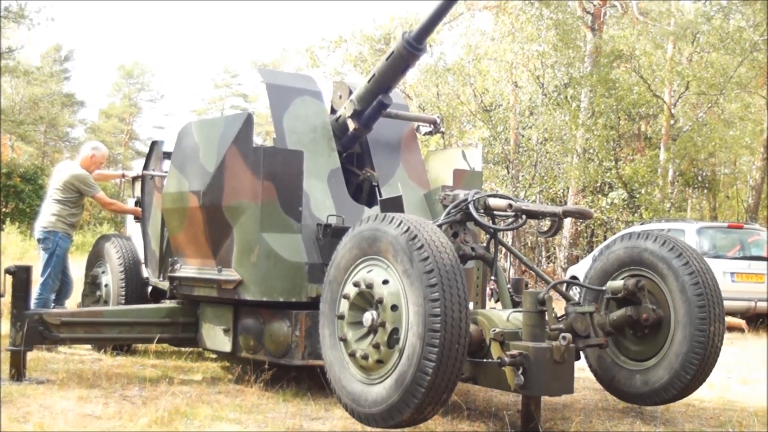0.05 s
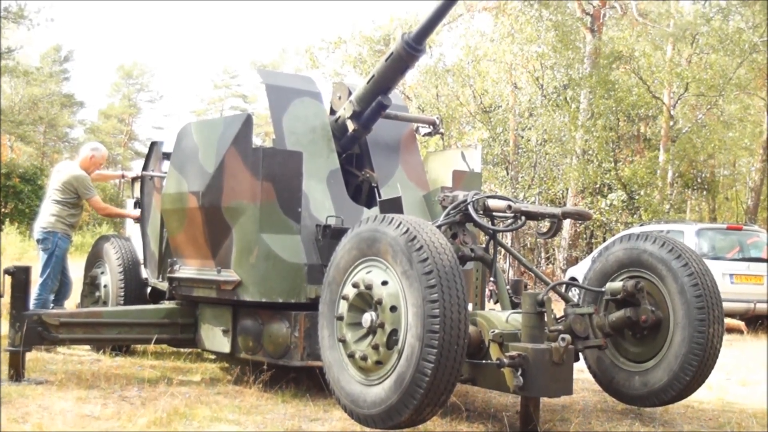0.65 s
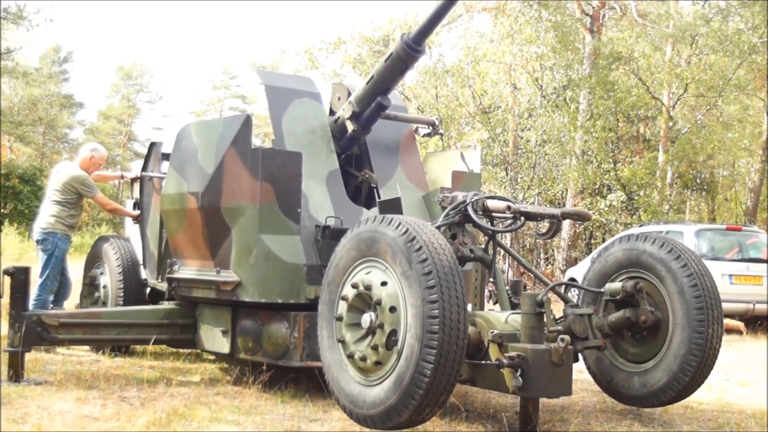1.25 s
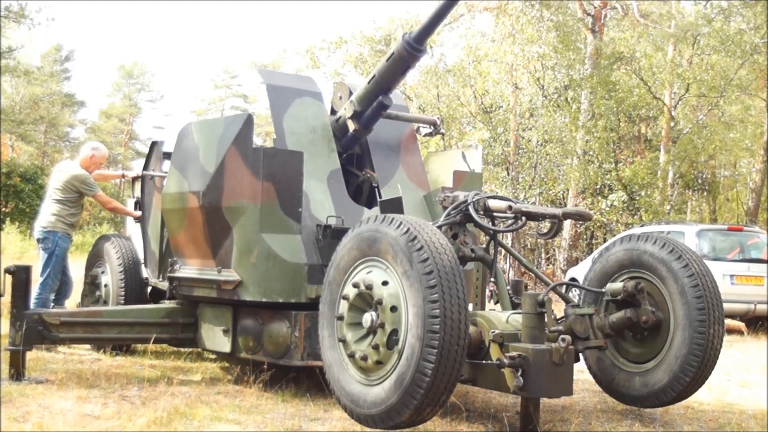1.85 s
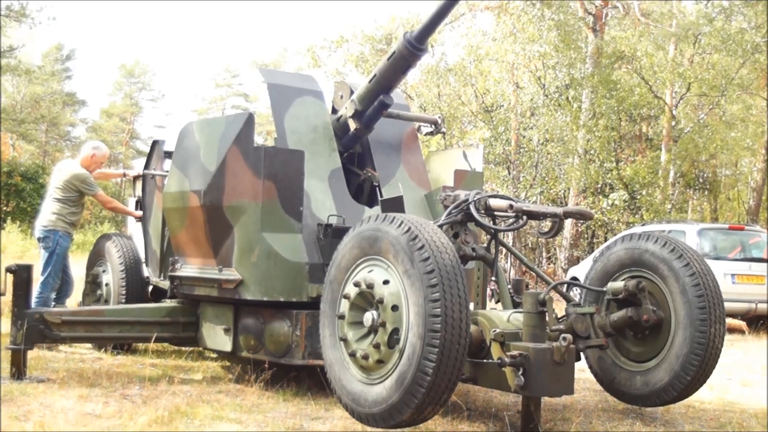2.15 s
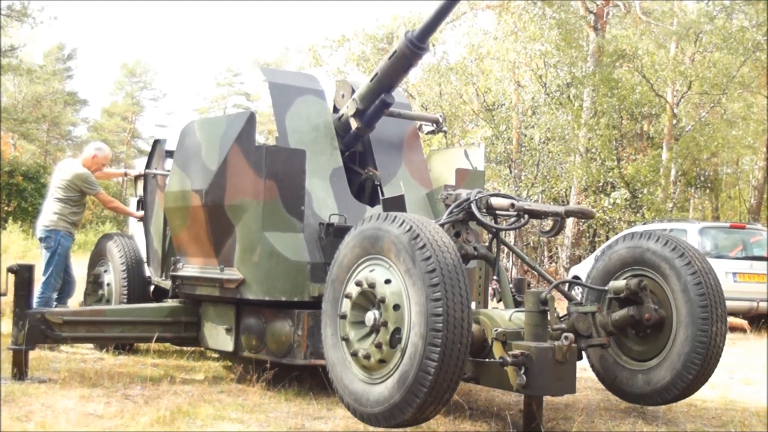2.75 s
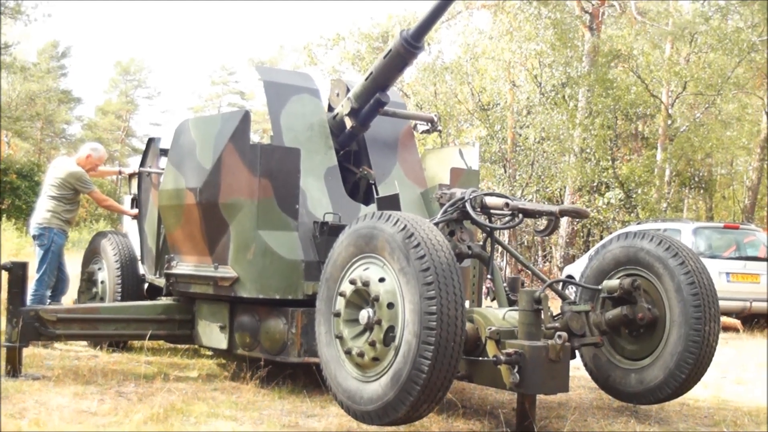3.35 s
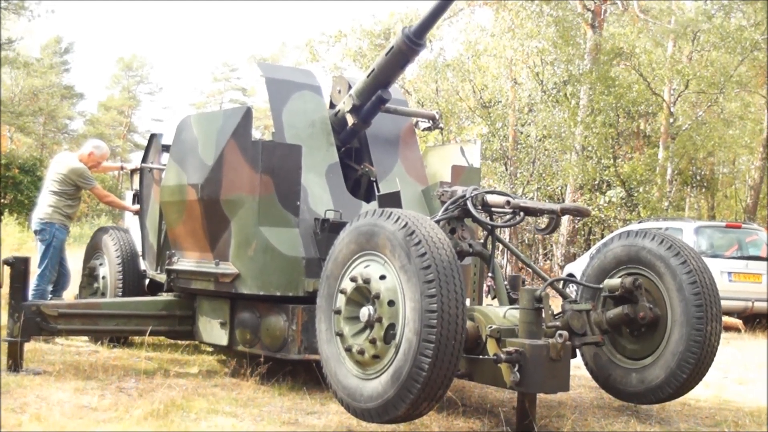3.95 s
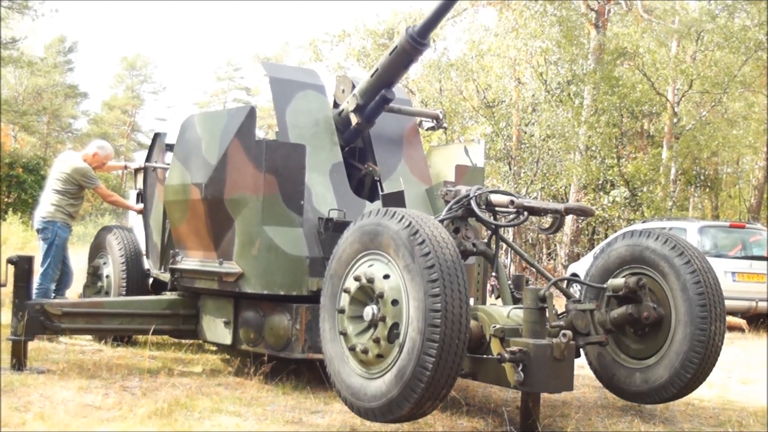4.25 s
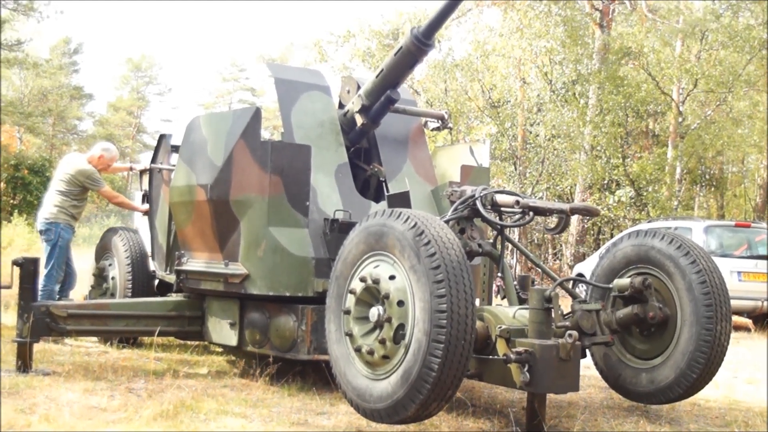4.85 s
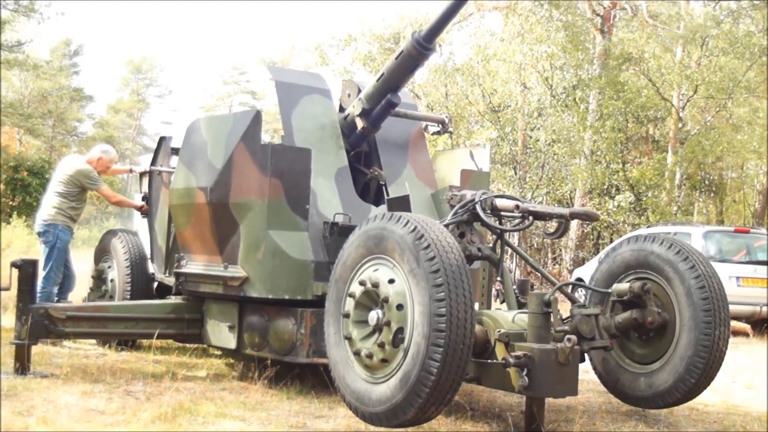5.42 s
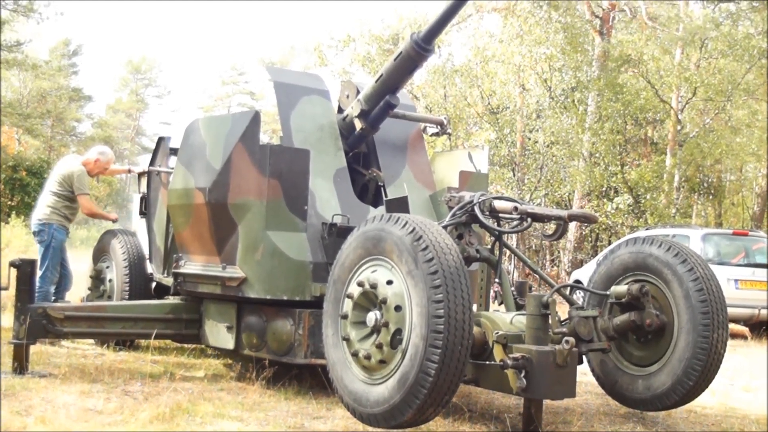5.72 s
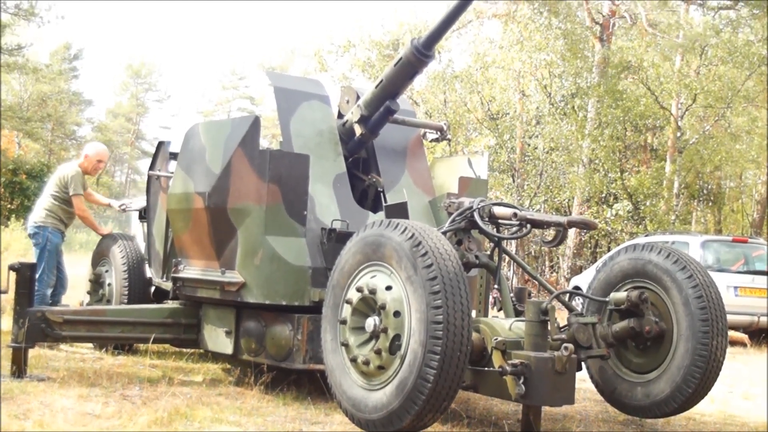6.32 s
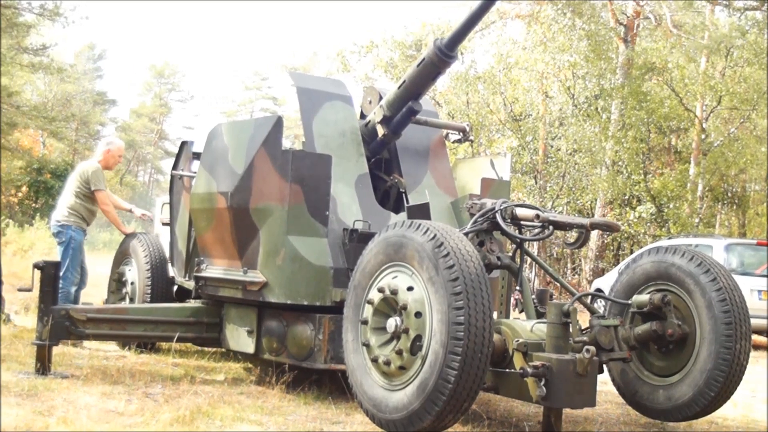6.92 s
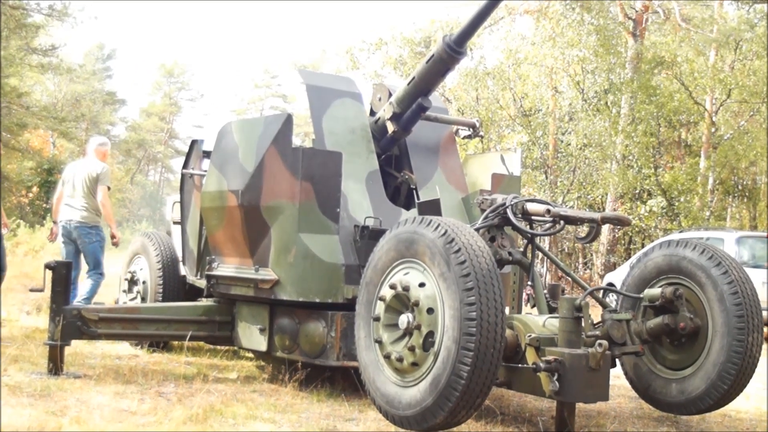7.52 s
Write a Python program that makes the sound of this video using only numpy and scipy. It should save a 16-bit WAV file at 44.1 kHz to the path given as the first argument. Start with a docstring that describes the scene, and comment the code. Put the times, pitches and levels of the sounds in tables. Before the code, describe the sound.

Slow thumps from a starting diesel engine quicken and merge into an even, clattering run in the open air.

```python
"""Outdoors, a small one-cylinder diesel on a towed gun carriage fires, speeds up and settles.
Each burn of fuel makes a hard knock and a puff in the exhaust pipe. The slow, separate thumps
merge into a throbbing drone, held steady by the governor (the part that limits the speed).
Valves clatter, gears whine faintly and the cooling fan hisses over a low open-air rumble.
The metal housing clacks a few times, and the drone dips slightly near the end."""
import sys
import numpy as np
from scipy import signal
from scipy.fft import rfft, irfft, next_fast_len
from scipy.io import wavfile
from scipy.ndimage import uniform_filter1d, minimum_filter1d, map_coordinates

SR = 44100
rng = np.random.default_rng(int(sys.argv[2]) if len(sys.argv) > 2 else 0)


def pcm_store(signal):
    """Save signal as 16-bit PCM."""
    levels = np.round(np.clip(np.atleast_2d(signal), -1, 1) * 32767)
    wavfile.write(sys.argv[1], SR, levels.astype(np.int16).T)


N = 334278


def amp(db):
    """Turn decibels into a gain to multiply by."""
    return 10 ** (np.asarray(db) / 20)

def unit(x):
    """Scale x to an average (rms) size of 1."""
    return x / np.sqrt(np.mean(x ** 2) + 1e-20)

def along(points, hz):
    """Read between (frequency, value) points on a pitch-like scale."""
    freqs, values = np.transpose(points)
    return np.interp(np.log(hz + 1), np.log(freqs + 1), values)

def curve(points):
    """Join (time, value) points into one value per sample."""
    return np.interp(np.arange(N) / SR, *np.transpose(points))

def wobble(rate):
    """A smooth curve through `rate` random values a second."""
    return map_coordinates(rng.standard_normal(int(N * rate / SR) + 4), [np.arange(N) * rate / SR])

def filtered(x, response):
    """Scale and delay each frequency in x as response(hz) says."""
    size = next_fast_len(N + SR // 2)
    return irfft(rfft(x, size) * response(np.fft.rfftfreq(size, 1 / SR)), size)[..., :N]

def coloured(x, colour):
    """Shape x with a table of levels by frequency, then scale it to size 1."""
    return unit(filtered(x, lambda hz: amp(along(colour, hz))))

def resonance(hz, centre_hz, width_hz):
    """How a ringing part answers each frequency; narrower rings longer."""
    return 1j * hz * width_hz / (centre_hz ** 2 - hz ** 2 + 1j * hz * width_hz)

def resonances(hz, rings):
    """How a part that rings at several pitches answers each frequency."""
    return sum(amp(db) * resonance(hz, centre, width) for centre, width, db in rings)

def ringing(x, centre_hz, width_hz):
    """Let x ring at one pitch."""
    return filtered(x, lambda hz: resonance(hz, centre_hz, width_hz) ** 2)

def noise(alike, size=N):
    """Stereo hiss; alike runs from 0 (unrelated sides) to 1 (identical)."""
    turn = np.arccos(np.clip(alike, 0, 1)) / 2
    mid, side = rng.standard_normal((2, size)) * [[np.cos(turn)], [np.sin(turn)]]
    return np.array([mid + side, mid - side])

def pulses(crank, place, scatter_db, lead_s=0):
    """One tap of slightly random size each time the crank passes a place in its cycle."""
    passes = np.arange(np.ceil(crank[0] - place), crank[-1] - place) + place
    samples = np.interp(passes, crank, np.arange(N)) - lead_s * SR
    sizes = amp(scatter_db * rng.standard_normal(len(samples)))
    return np.bincount(np.clip(np.round(samples), 0, N - 1).astype(int), sizes, N)

def burst(crank, place, length, steepness=16):
    """A swell that rises once a cycle and fades; place and length are in cycles."""
    age = (crank - place) % 1 / length
    return (1 - np.exp(-steepness * age)) * np.exp(-age)

# How fast the engine runs, one firing per cycle: (time [s], speed [cycles/s])
SPEED = [(0.0, 6.0), (0.18, 7.25), (0.3, 8.7), (0.42, 10.56), (0.65, 13.55), (0.9, 17.25), (1.15, 20.58),
         (1.4, 23.6), (1.65, 24.46), (1.9, 24.95), (2.2, 25.34), (2.8, 25.49), (3.5, 25.53), (4.3, 25.59),
         (5.5, 25.57), (7.58, 25.57)]
def speed_share():
    """Engine speed as a share of its final, steady speed."""
    return curve(SPEED) / SPEED[-1][1]

# Plenty of fuel to gain speed, then the governor cuts back: (time [s], fuel level [dB])
FUEL = [(0, -1.5), (.45, -1.5), (.95, 1), (1.42, -1.5), (1.52, -12.5), (2.2, -9), (2.9, -20)]
def driven(db, doubling_db, fuel_power=0):
    """A gain: db at steady speed, doubling_db more per doubling of speed, plus a share of the fuel."""
    return amp(db + doubling_db * np.log2(speed_share()) + fuel_power * curve(FUEL))

# Tone of the open air: (frequency [Hz], relative level [dB])
OUTDOOR_COLOUR = [(20, -4), (60, -0.5), (150, 9.5), (400, -6.5), (1500, -10.5), (6000, -24), (10000, -28.5),
                  (14000, -42)]
def outdoors():
    """A low, even rumble lies behind everything."""
    return amp(-35) * coloured(noise(0.42), OUTDOOR_COLOUR)

# What the muffler lets through: (frequency [Hz], relative level [dB])
MUFFLER_COLOUR = [(30, -21), (60, -2), (150, -3.5), (230, 7), (320, 3), (400, -8), (490, -11.5),
                  (620, -5.5), (740, -4.5), (920, -28), (1500, -43)]
def gas_rush(crank):
    """Swirling gas makes a rough rush that swells each time the exhaust opens."""
    flow = unit(1 + 0.23 * burst(crank, 0.215, length=0.62))
    rush = coloured(noise(0.91), MUFFLER_COLOUR)
    return driven(-28.5, doubling_db=1.2, fuel_power=0.066) * flow * rush

# Piston and valve hits: (place [cycles], relative level [dB], pitch [Hz], ring width [Hz])
CONTACTS = [(-.16, -8, 1950, 350), (-.075, 0, 1440, 190), (.075, -8, 2600, 1500), (.195, 1.5, 1215, 210),
            (.43, -7, 1750, 400), (.45, -13, 1130, 160), (.51, -11, 2400, 504), (.62, -9, 1400, 295),
            (.69, -12, 2980, 1800)]
def valve_taps(crank):
    """The piston and valves tap at set places in every cycle, each with its own short ring."""
    taps = np.zeros(N)
    for place, db, ring_hz, width_hz in CONTACTS:
        hits = pulses(crank, place, scatter_db=0.9)
        taps += amp(db) * unit(ringing(hits, ring_hz, width_hz))
    return driven(-39.6, doubling_db=22) * unit(taps)

# Rings of the thin metal covers: (pitch [Hz], width [Hz], relative level [dB])
COVER_RINGS = [(1360, 8.5, -16), (1848, 18.5, 3.5), (2430, 44, -3), (3690, 36, 9), (5000, 50, 2)]
# Tone of the clatter: (frequency [Hz], relative level [dB])
CLATTER_COLOUR = [(600, -6), (800, -16), (900, -12), (1060, -10), (1200, -2), (1500, 1), (1750, -5),
                  (2200, -3.5), (2750, -13.5), (3200, -13), (3800, -15.5), (4500, -17), (7000, -26),
                  (12000, -27.5)]
def clatter(crank, looseness=0.61, fade_s=0.13):
    """The same hits set the engine block and its covers ringing, with a loose rattle on top."""
    decay = amp(-60 * np.arange(SR // 12) / SR / fade_s)
    block, energy = np.zeros((2, N)), np.zeros(N)
    for place, db, _, _ in CONTACTS:
        hits = amp(db) * pulses(crank, place, scatter_db=1.4)
        one_hit = decay * noise(0.95, size=len(decay))
        block += signal.fftconvolve(hits[None], one_hit, axes=1)[:, :N]
        energy += signal.fftconvolve(hits ** 2, decay ** 2)[:N]
    rattle = looseness * unit(np.sqrt(np.abs(energy)) * noise(0.83))
    covers = filtered(unit(block) + rattle, lambda hz: 1 + resonances(hz, COVER_RINGS))
    return driven(-39.5, doubling_db=6) * coloured(covers, CLATTER_COLOUR)

# Two soft extra thumps in the pipe as the engine starts: (time [s], relative level [dB])
EXTRA_THUMPS = [(0.016, -10), (0.298, -15)]
# Rings of the muffler's chambers: (pitch [Hz], width [Hz], relative level [dB])
CHAMBER_RINGS = [(172, 15, 3), (228, 22, -1), (283, 18, -3), (320, 20, -5)]
def thumps(crank, muffler_hz=345, leak=0.07):
    """Puffs of exhaust and intake air ring the pipe and muffler; their boom fades with speed."""
    speed = speed_share()
    separate = 1 / (1 + (speed / 0.782) ** 14)  # intake puffs fade out near 78% speed
    intake = separate * amp(1) * pulses(crank, 0.506, scatter_db=1.2, lead_s=0.00605)
    intake_shut = separate * amp(-5) * speed * pulses(crank, 0.72, scatter_db=2.5, lead_s=0.00595)
    exhaust = pulses(crank, 0.2568, scatter_db=1.1, lead_s=0.005635)
    puffs = driven(-7.5, doubling_db=-3.5, fuel_power=0.25) * exhaust + intake + intake_shut
    for time, db in EXTRA_THUMPS:
        puffs[round(time * SR)] += amp(db)
    pipe = lambda hz: resonance(hz, centre_hz=195, width_hz=175)
    ring = filtered(puffs, lambda hz: pipe(hz) * (leak + pipe(hz) + resonances(hz, CHAMBER_RINGS)))
    boom = amp(-6) * ringing(puffs * (1 - speed) ** 2, centre_hz=74.6, width_hz=55)
    treble_cut = signal.butter(4, muffler_hz, fs=SR, output="sos")
    return amp(33) * signal.sosfilt(treble_cut, ring + boom)

# Tone of the burning fuel: (frequency [Hz], relative level [dB])
BURN_COLOUR = [(220, -15), (350, -2), (415, 3.5), (480, -11), (600, -6), (755, -2), (920, -10),
               (1160, -4.5), (1340, -10), (1570, -3.5), (1950, -8.5), (2700, -16), (3300, -17.5),
               (3900, -27.5), (5200, -28.5), (10000, -32.5), (13000, -38)]
# Rings of the cylinder head, its metal lid: (pitch [Hz], width [Hz], relative level [dB])
HEAD_RINGS = [(624, 30, -2), (748, 33, 7), (1190, 45, 4), (1483, 50, 4), (1610, 50, -4), (2930, 95, 6.5),
              (3200, 88, 4), (3800, 140, 3)]
def rasp(loudness):
    """The noise of burning follows a loudness curve, and the cylinder head rings on after it."""
    def head(hz):
        response = amp(along(BURN_COLOUR, hz)) * (1 + resonances(hz, HEAD_RINGS))
        return response / np.sqrt(np.mean(np.abs(response) ** 2))
    return filtered(loudness * noise(0.88), head)

def knock(crank, lead_s=0.0038, steady_part=0.11):
    """Fuel burns with a harsh rasp, then chuffs as the exhaust opens; more fuel is louder."""
    early = crank + lead_s * curve(SPEED)  # earlier in the cycle as speed rises
    burn = burst(early, -0.053, length=0.12, steepness=2.6)
    chuff = amp(-1) * burst(early, 0.16, length=0.19, steepness=2.1)
    return rasp(driven(-30.8, doubling_db=5.8, fuel_power=1.33) * unit(steady_part + burn + chuff))

# The first firings and their exhaust blows: (time [s], level [dB], time to fade 60 dB [s])
BARKS = [(.054, -23, .14), (.102, -26, .07), (.205, -22.5, 0.094), (.235, -23, .08), (.32, -34, .16)]
def barks(rise_s=0.0017):
    """Cold fuel catches all at once with a sudden, dry bark."""
    loudness = np.zeros(N)
    for time, db, fade_s in BARKS:
        age = np.maximum(np.arange(N) / SR - time, 0)
        loudness += amp(db - 60 * age / fade_s) * (1 - np.exp(-age / rise_s))
    return rasp(loudness)

def honk(crank):
    """Hard exhaust blows ring the thin shell of the muffler."""
    blows = pulses(crank, 0.1863, scatter_db=1.5)
    shell = unit(ringing(blows, centre_hz=368, width_hz=85))
    return driven(-31.5, doubling_db=16, fuel_power=0.72) * shell

# Clacks and scrapes of the housing:
# (time [s], level [dB], pitch [Hz], ring width [Hz], time to fade 60 dB [s], crack share [0-1])
CLACKS = [(.302, -19, 2130, 600, 0.029, .07), (3.032, -33, 3800, 4000, .16, 0.45),
          (3.052, -22, 7170, 2500, .018, 0.6), (3.054, -28, 3200, 3000, 0.022, 0.4),
          (3.058, -23, 2200, 1700, .023, 0.2), (3.195, -41, 5000, 4000, .3, 0.2),
          (6.584, -35, 2340, 1500, .19, .4)]
def clacks():
    """Metal meets metal: a sharp crack and one quickly fading ring."""
    out, age = np.zeros((2, N)), np.arange(SR // 4) / SR
    for time, db, ring_hz, width_hz, fade_s, crack_share in CLACKS:
        crack = crack_share * noise(0.28)
        ring = (1 - crack_share) * unit(ringing(noise(0.42), ring_hz, width_hz))
        start, decay = round(time * SR), amp(db - 60 * age / fade_s)
        out[:, start:start + len(age)] += decay * (crack + ring)[:, :len(age)]
    return out

def push(strokes, multiple):
    """How the strokes of one cycle add up at a multiple of the engine speed."""
    return sum(strength * np.exp(-2j * np.pi * multiple * place) for place, strength in strokes)

# The tones in the drone: (multiple of engine speed [x], relative level [dB])
DRONE_TONES = [(1, -42), (2, -23.5), (3, -2.5), (4, -4), (5, -2), (6, 2), (7, 0.5), (8, 4), (9, 1.5),
               (10, -12), (11, 0), (12, 3.5), (13, -19), (14, -29), (15, -38), (16, -15), (17, -19),
               (18, -22), (19, -34), (20, -18), (21, -36), (22, -42), (23, -15), (24, -25.5), (25, -11.5),
               (26, -28), (27, -19.5), (28, -8), (29, -16), (30, -23.5), (31, -35), (32, -22), (33, -19)]
# Firing, exhaust, intake opening and intake closing: (place [cycles], strength [0-1])
GAS_STROKES = [(.006, 0.97), (.184, 0.699), (.363, .64), (.623, 0.618)]
# Strokes that shake the housing: (place [cycles], strength [0-1])
HOUSING_STROKES = [(.19, 1), (.52, .5), (.84, .75)]
def drone(crank, dip_at_s=6.92, dip_width_s=0.074, dip_db=-1):
    """At speed the strokes overlap in the pipe and shake the housing, blending into steady tones."""
    times, speed = np.transpose(SPEED)
    bass, pipe, housing = np.zeros((3, N))
    for multiple, db in DRONE_TONES:
        hz = multiple * speed  # each tone changes level as its pitch climbs
        if multiple <= 15:
            layer = bass if multiple <= 4 else pipe
            pipe_ring = resonance(hz[-1], centre_hz=146, width_hz=140)
            phase = np.angle(-push(GAS_STROKES, multiple) * pipe_ring ** 2)
            climb_db = 1.8 * along(MUFFLER_COLOUR, hz)
        else:
            layer = housing
            housing_ring = resonance(hz, centre_hz=690, width_hz=130)
            phase = np.angle(push(HOUSING_STROKES, multiple) * housing_ring[-1] ** 2)
            climb_db = 5 * np.log10(np.abs(housing_ring))
        gain = curve(np.c_[times, amp(db + climb_db - climb_db[-1])])
        layer += gain * np.cos(2 * np.pi * multiple * crank + phase)
    for layer in (bass, pipe, housing):  # even out each layer, so speed sets its loudness
        layer /= np.sqrt(np.abs(uniform_filter1d(layer ** 2, size=SR // 4)))
    bass *= driven(-22.5, doubling_db=42) * amp(0.4 * wobble(12))
    pipe *= driven(-18.5, doubling_db=48)
    housing *= driven(-33, doubling_db=75) * amp(0.65 * wobble(20))
    dip = np.exp(-((np.arange(N) / SR - dip_at_s) / dip_width_s) ** 2)
    return amp(dip_db * dip) * (bass + pipe + housing)

# Tone of the cooling air: (frequency [Hz], relative level [dB])
FAN_COLOUR = [(300, 3), (950, 7.5), (1400, 7.5), (2000, 1), (3000, 3), (3900, 0), (4700, -9), (6500, -4),
              (7600, -8), (10000, -7.5), (11800, -16.5), (15500, -11)]
def fan(crank):
    """The fan on the flywheel hisses, swelling a little once a cycle."""
    swell_db = 1.7 * np.cos(2 * np.pi * (crank - 0.75))
    flutter_db = 0.23 * wobble(11) + 0.66 * wobble(250)
    return driven(-41, doubling_db=25) * amp(swell_db + flutter_db) * coloured(noise(0.62), FAN_COLOUR)

def buzz(crank, waver_db=3):
    """The housing buzzes while the engine works hard, and quietens as the fuel is cut back."""
    tones = sum(amp(waver_db * wobble(4.4)) * np.cos(2 * np.pi * (multiple * crank + rng.random()))
                for multiple in range(36, 46))
    return driven(-39, doubling_db=32, fuel_power=0.49) * unit(tones)

# Tones of the gears that time the valves: (multiple of engine speed [x], relative level [dB])
GEAR_TONES = [(38, -10), (52, -9), (72, -13), (95, -18), (105, -20), (142, -18)]
def gear_whine(crank, waver_db=3.9, waver_rad=0.36):
    """The gears sing faintly and unsteadily, rising in pitch with the engine."""
    tones = np.zeros(N)
    for multiple, db in GEAR_TONES:
        gain = amp(db + waver_db * wobble(20))
        tones += gain * np.sin(2 * np.pi * multiple * crank + waver_rad * wobble(20))
    return driven(-38.5, doubling_db=35) * tones

def scene():
    """The turning crank keeps the engine's sounds in step; clacks and open air join them."""
    crank = np.cumsum(curve(SPEED)) / SR - 0.424  # counts cycles, 0 at the first firing
    exhaust = thumps(crank) + drone(crank) + gas_rush(crank) + honk(crank)
    burning = knock(crank) + barks()
    machinery = valve_taps(crank) + clatter(crank) + buzz(crank) + gear_whine(crank) + fan(crank)
    return exhaust + burning + machinery + outdoors() + clacks()

def limiter(x, ceiling_db=-5.5, recovery_db_per_s=150, look_ahead_s=0.0018):
    """Turn loud peaks down just before they arrive, then let the level climb back."""
    size = round(look_ahead_s * SR)
    peak_db = 20 * np.log10(np.abs(x).max(axis=0) + 1e-9)
    needed_db = minimum_filter1d(np.minimum(ceiling_db - peak_db, 0), 2 * size)
    recovery_db = recovery_db_per_s * np.arange(N) / SR
    gain_db = np.minimum.accumulate(needed_db - recovery_db) + recovery_db
    return x * amp(uniform_filter1d(gain_db, size))

# The two microphones: (frequency [Hz], left louder by [dB], left earlier by [rad])
MIC_PAIR = [(50, 12, .3), (80, 3, .7), (170, 5, 0.75), (355, 3.5, 0.91), (605, -.3, 0.74),
            (1320, -0.5, 0.37), (3040, 0.5, 0.46), (10000, 0, 0.13)]
def record(dry, top_hz=15850):
    """Low notes reach the left side earlier and louder; peaks are tamed and the top treble is cut."""
    mics, sides = np.array(MIC_PAIR), np.array([[0.5], [-0.5]])
    balance = lambda hz: amp(sides * along(mics[:, [0, 1]], hz))
    timing = lambda hz: np.exp(1j * sides * along(mics[:, [0, 2]], hz))
    stereo = filtered(dry, lambda hz: balance(hz) * timing(hz))
    return filtered(limiter(stereo), lambda hz: hz < top_hz)


dry = scene()
out = record(dry)
pcm_store(out)
```